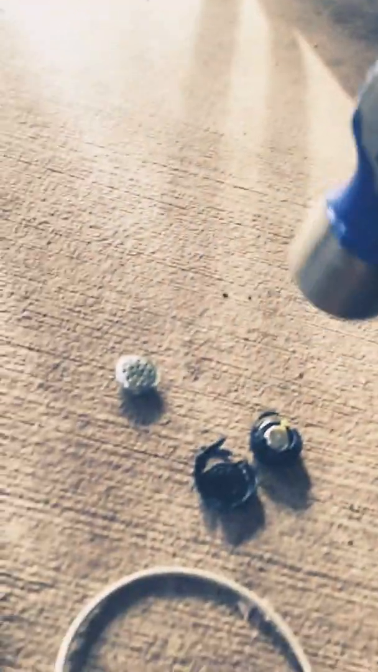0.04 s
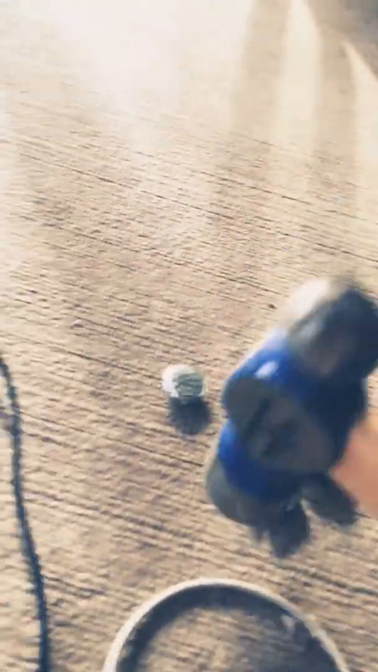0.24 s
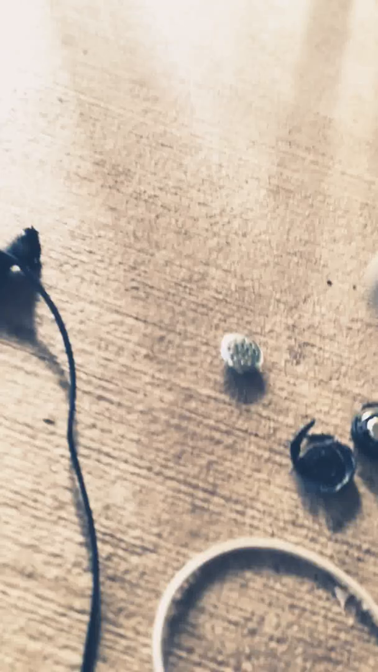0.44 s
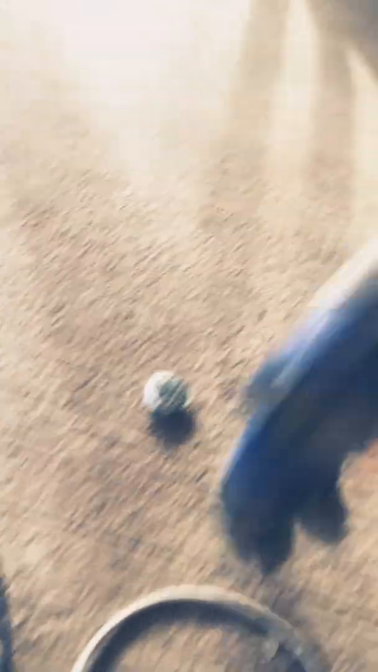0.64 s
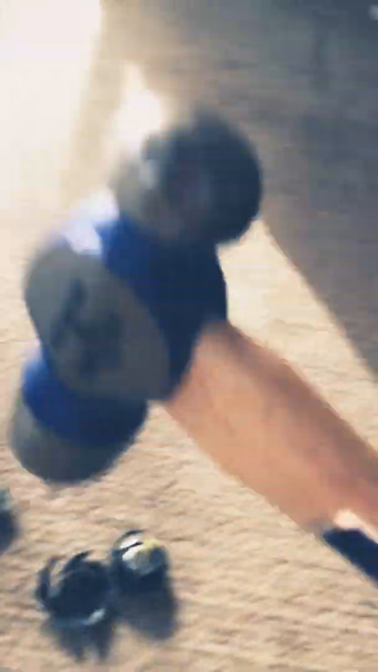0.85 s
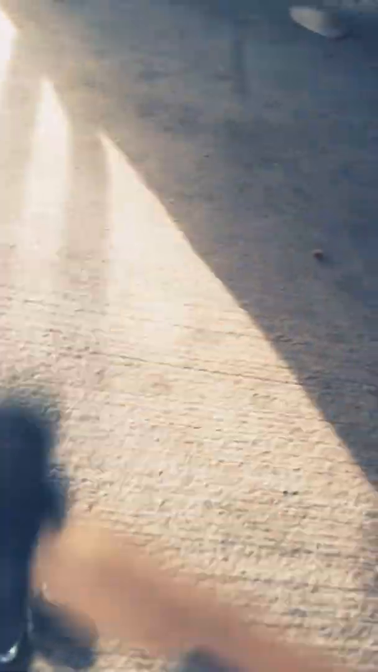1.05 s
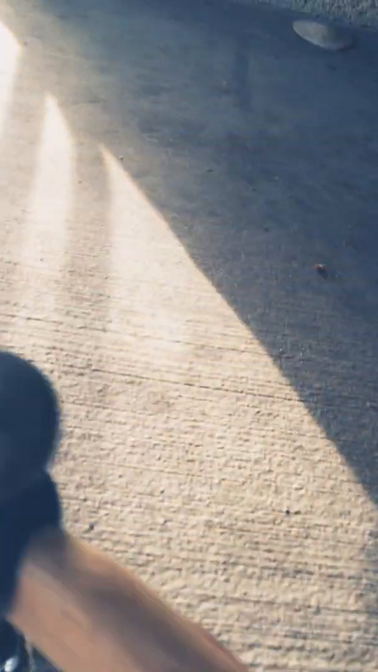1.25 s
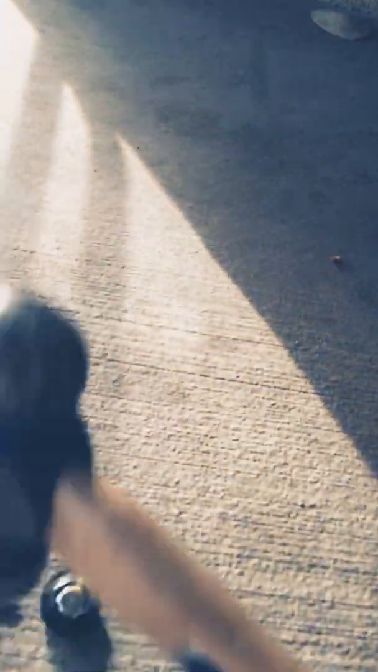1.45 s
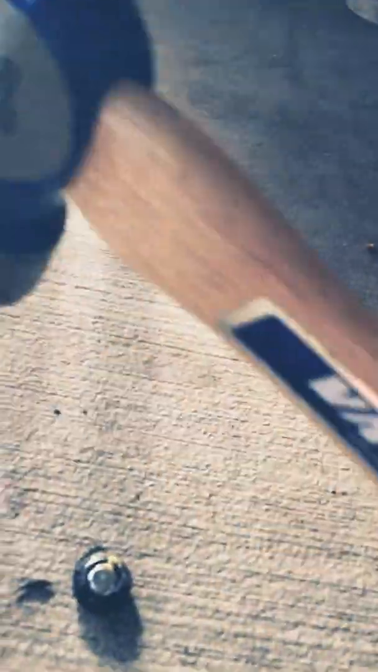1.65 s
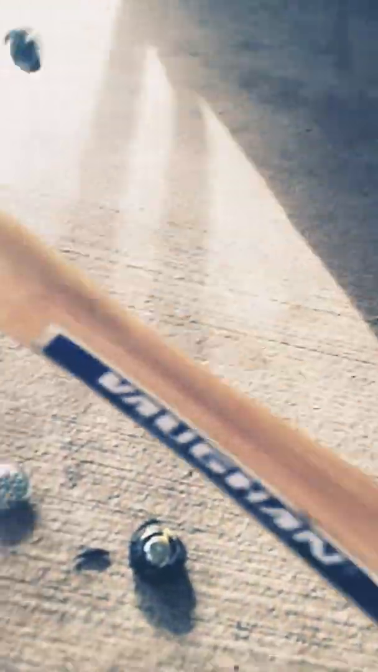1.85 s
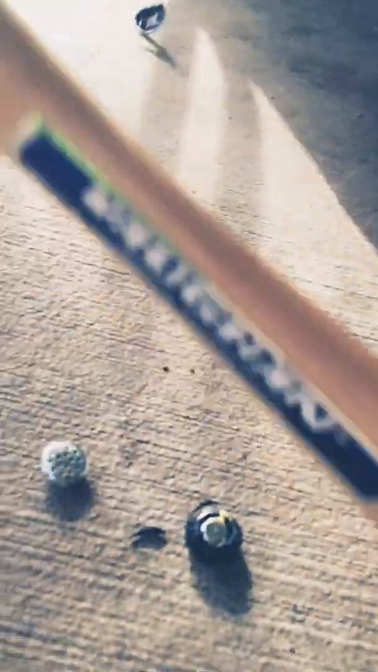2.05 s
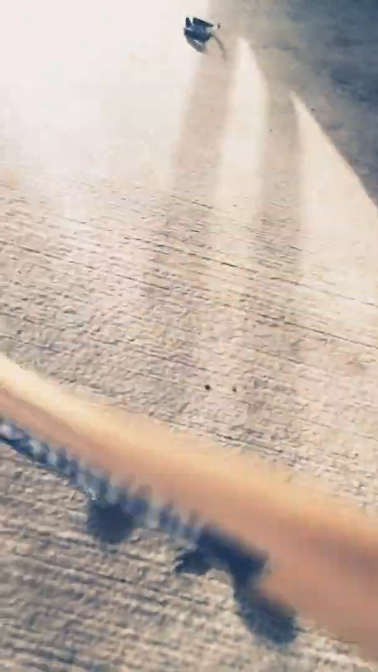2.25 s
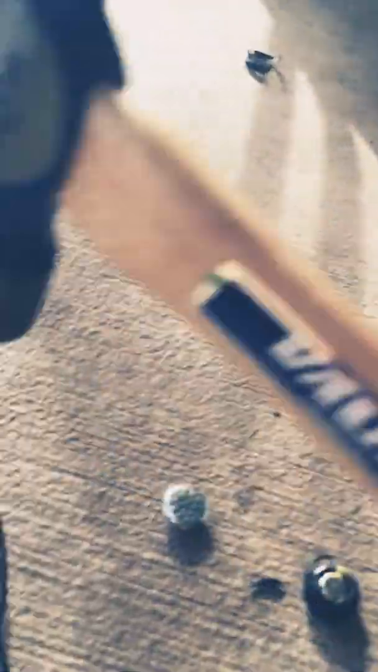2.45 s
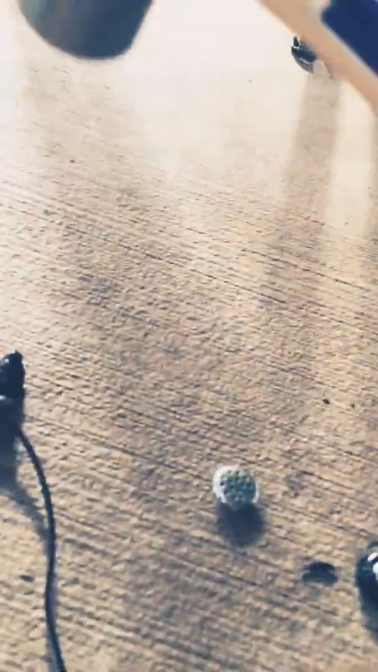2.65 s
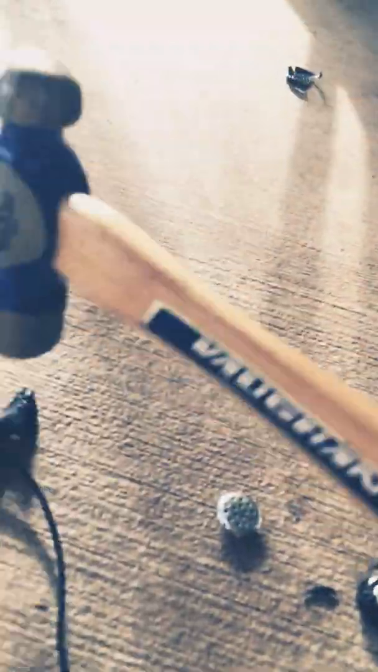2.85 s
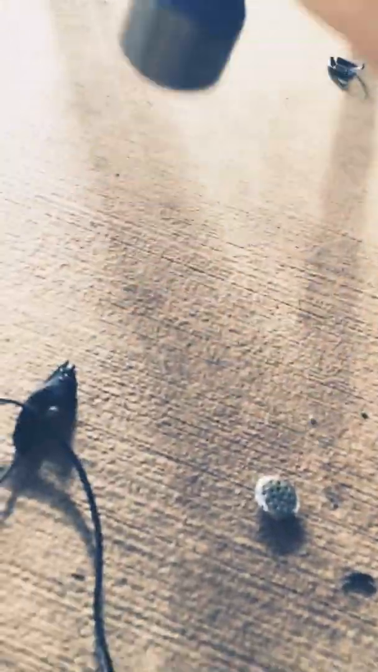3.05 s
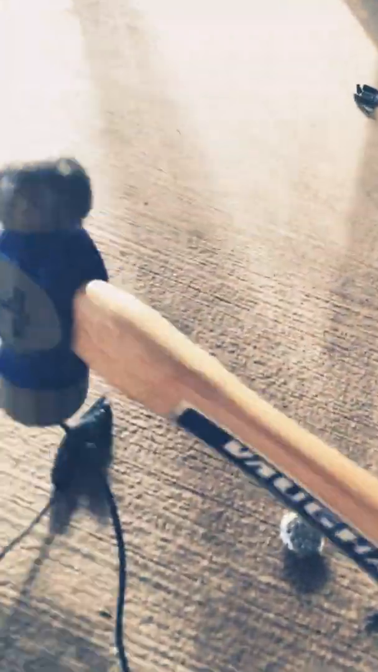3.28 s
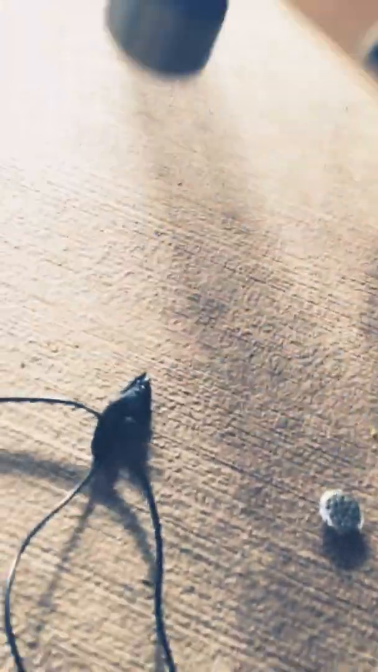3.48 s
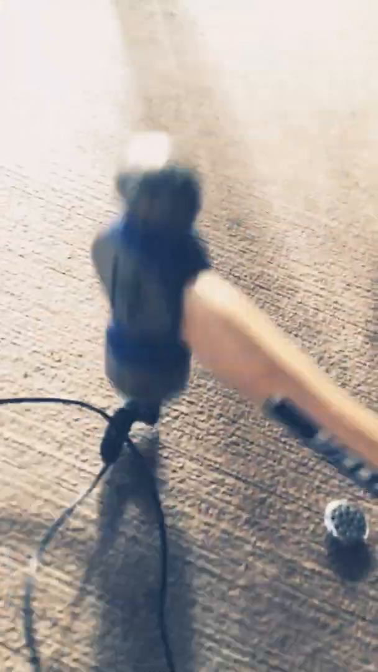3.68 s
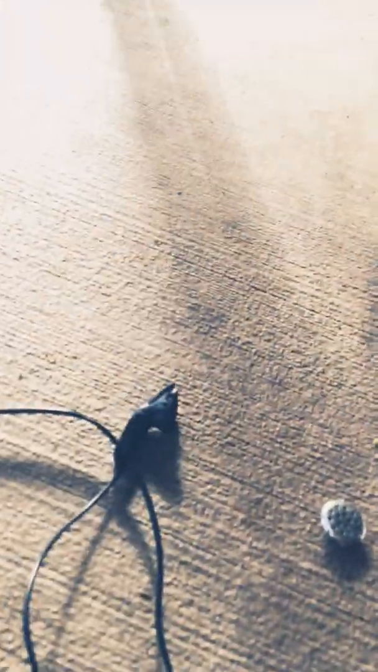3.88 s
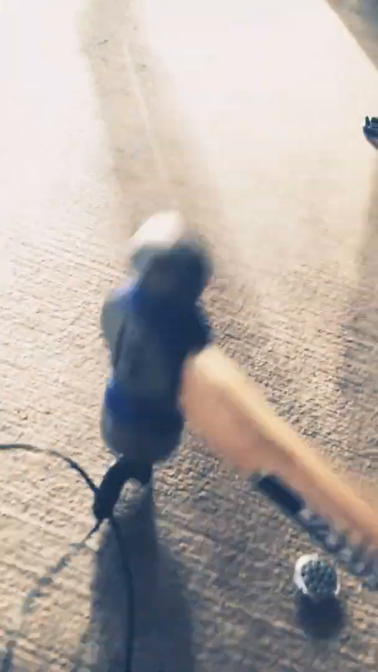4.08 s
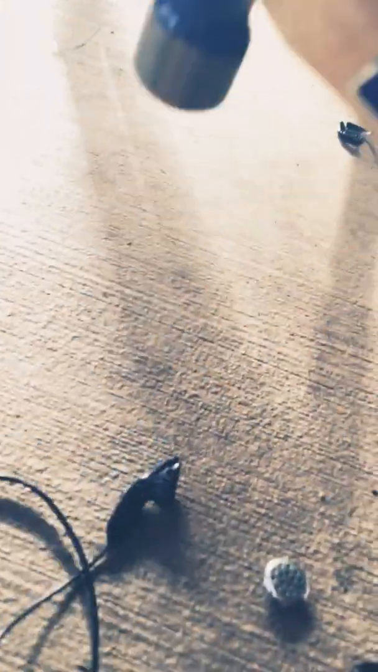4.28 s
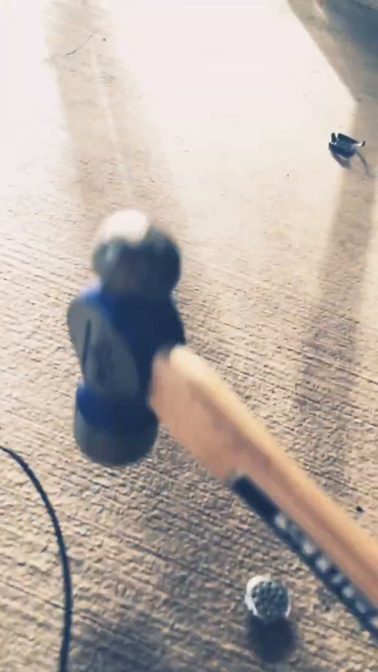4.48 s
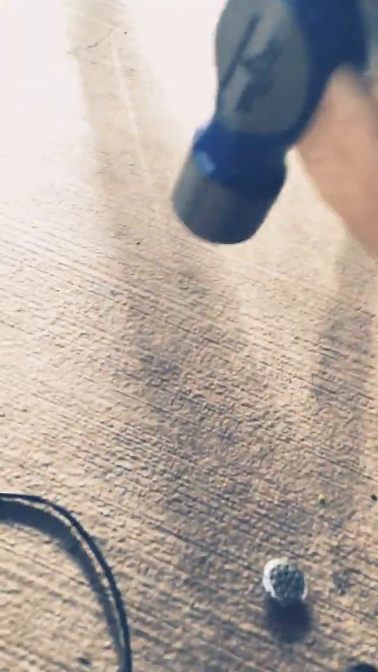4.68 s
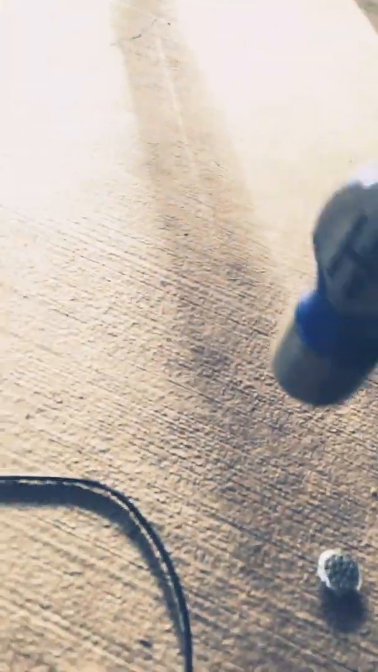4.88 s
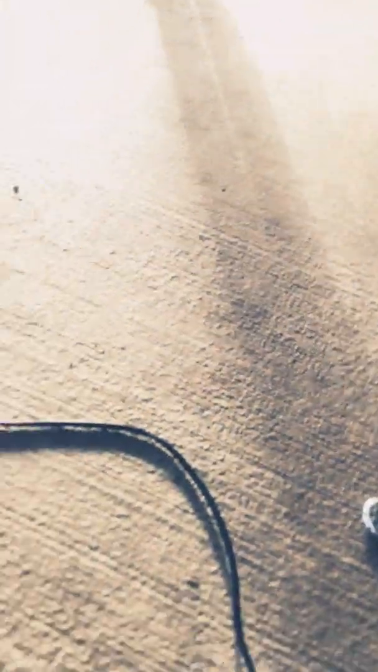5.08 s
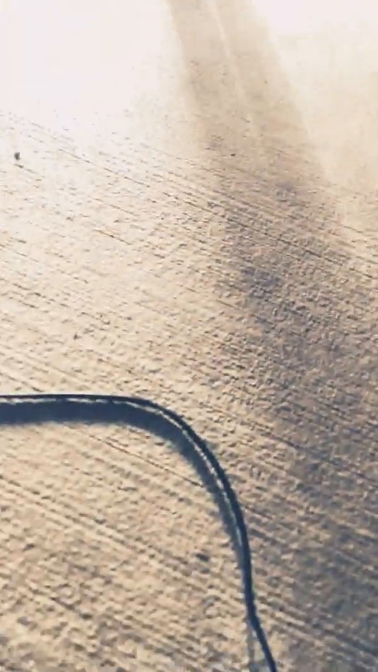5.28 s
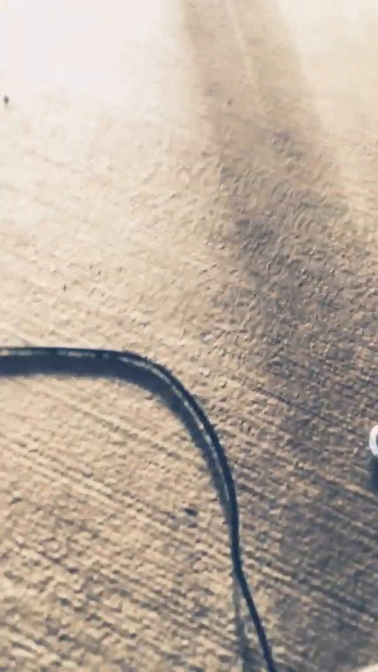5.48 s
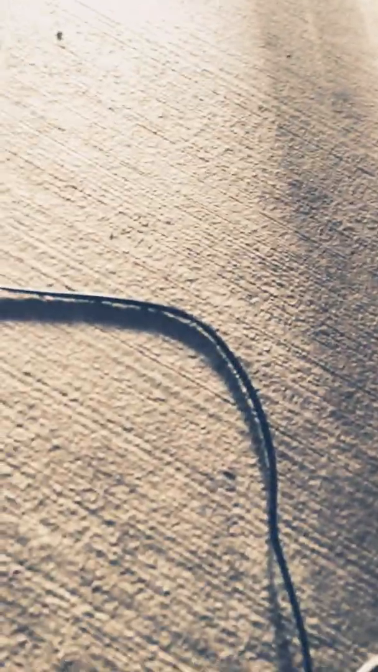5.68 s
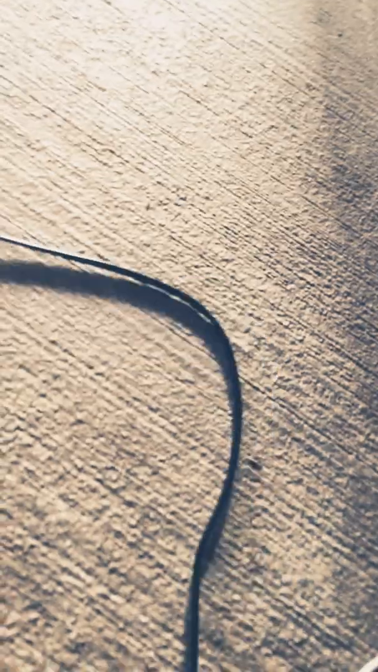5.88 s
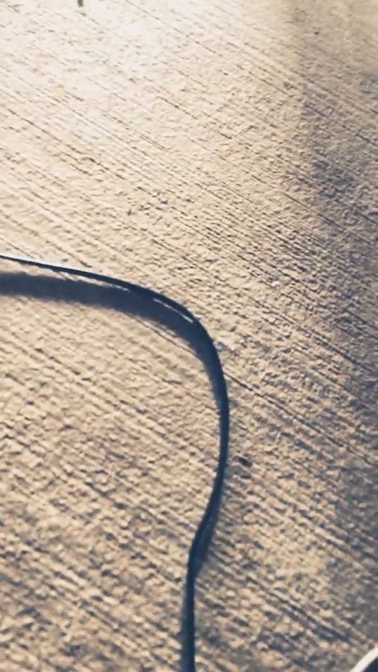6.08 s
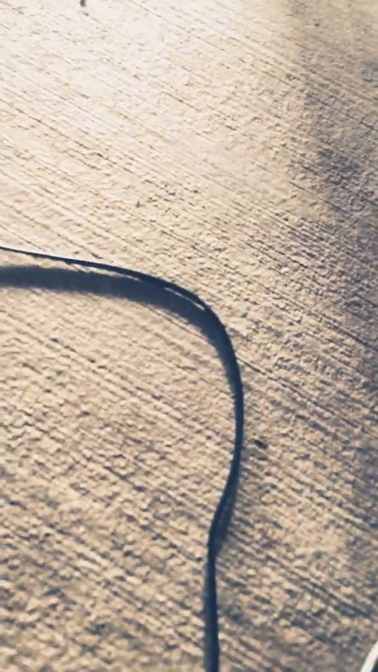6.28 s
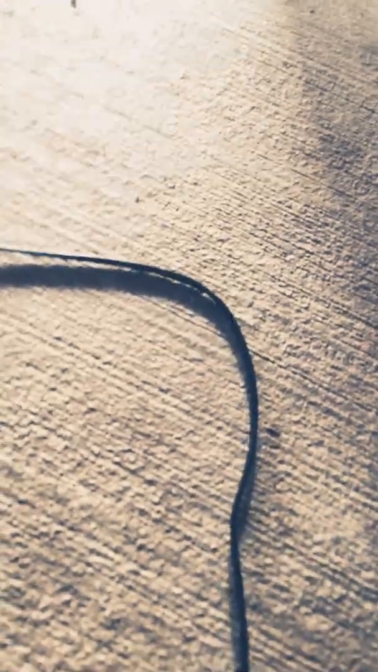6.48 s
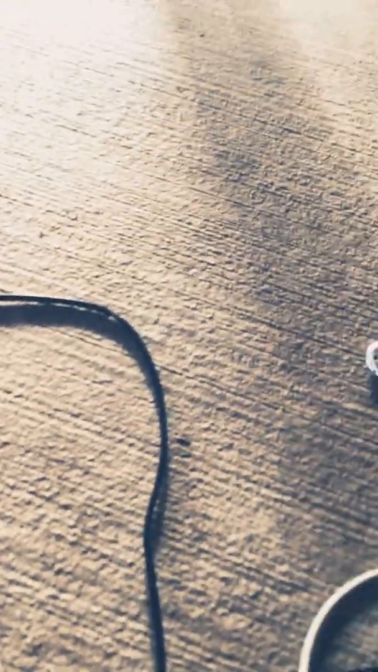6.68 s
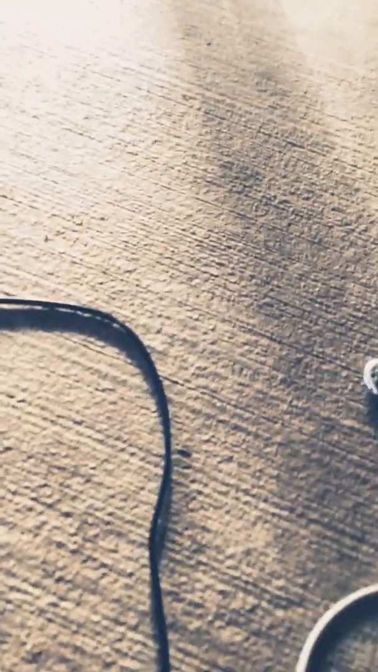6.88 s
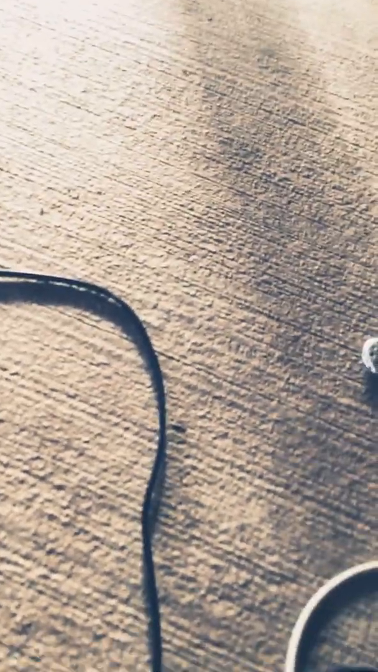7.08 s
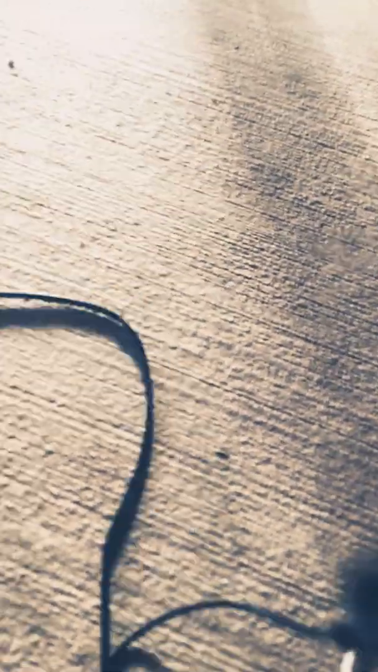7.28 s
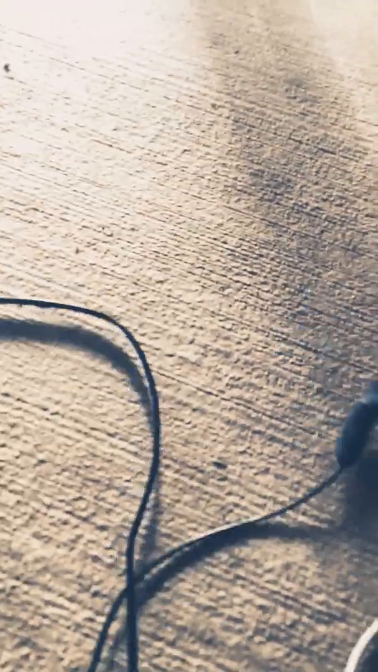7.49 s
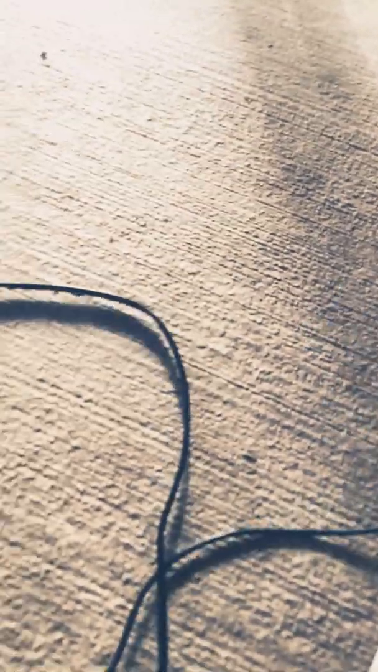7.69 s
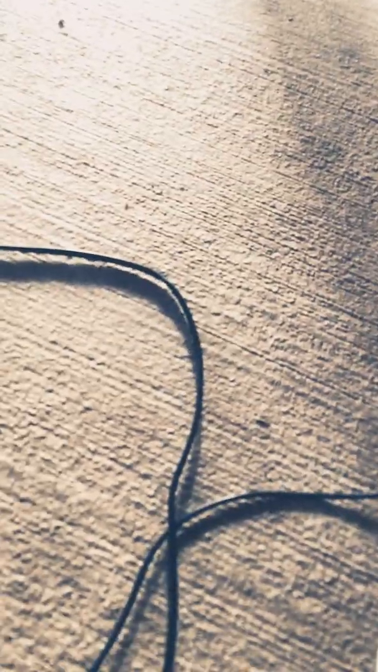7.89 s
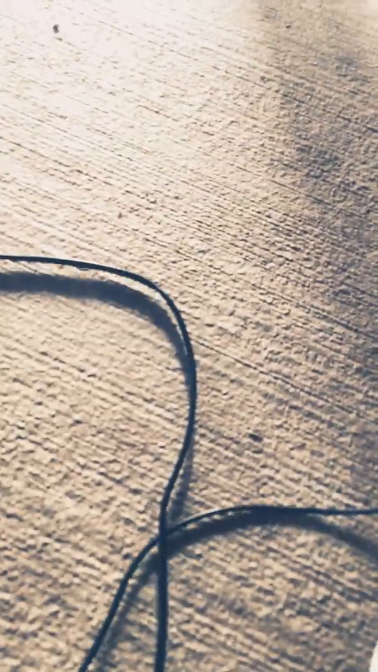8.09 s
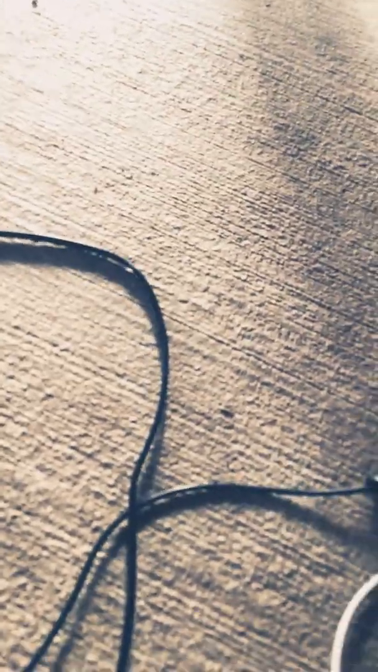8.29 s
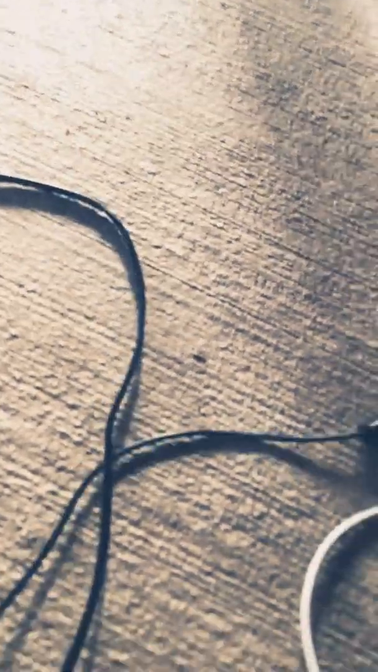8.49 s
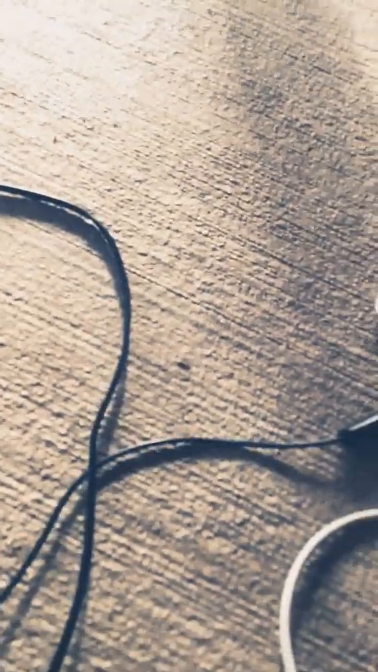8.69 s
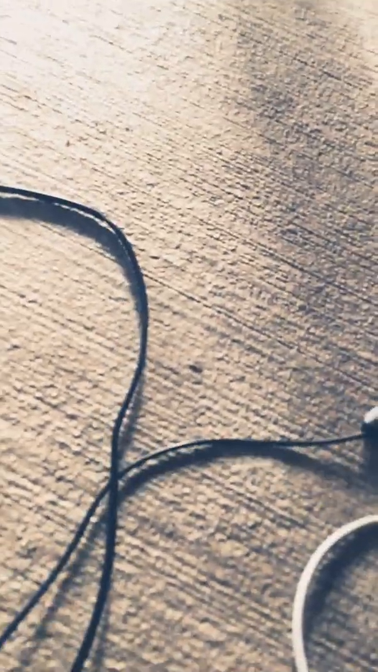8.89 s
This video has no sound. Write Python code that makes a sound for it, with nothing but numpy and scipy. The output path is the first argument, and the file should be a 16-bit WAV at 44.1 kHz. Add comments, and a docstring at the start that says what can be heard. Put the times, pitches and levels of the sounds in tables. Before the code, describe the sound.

Close, irregular hammer blows crunch brittle plastic against a concrete floor, scattering tiny clicking bits, while a soft low hum continues indoors.

```python
"""A low machine hum fills a room with a concrete floor; a phone microphone lies close to the blows.
A hammer crushes small plastic earpieces: at each blow filtered noise bursts snap as the plastic cracks,
then dying sines and crunch noise make the clack, and a thud sets off the slab ring; the room answers.
Fuzzy tones of resonant noise, mostly faint, sound during and between blows, fragments tick as they are
flicked or land, and later one loose shell hops and rings on dying sines."""
import sys
import numpy as np
from scipy import signal
from scipy.fft import rfft, irfft
from scipy.io import wavfile
from scipy.ndimage import uniform_filter1d

SR = 44100
rng = np.random.default_rng(int(sys.argv[2]) if len(sys.argv) > 2 else 0)


def file_out(sig):
    """Save sig as 16-bit WAV at sys.argv[1]."""
    # one column per channel
    cols = np.atleast_2d(sig).T
    # limit, then scale
    lim = np.clip(cols, -1, 1)
    pcm = np.round(lim * 32767).astype(np.int16)
    wavfile.write(sys.argv[1], SR, pcm)


N = 394254

EDGE_HZ = 16400  # upper band limit of the whole sound, and the highest ring of a crack
SNAP_LEAD_S = 0.0015  # a snap builds up this long before its onset
THUD_LEAD_S = 0.008  # the middle of the thud's push lies this far into its sound


def gain_of(db):
    """Decibels to amplitude."""
    return 10 ** (np.asarray(db) / 20)


def evened(x):
    """Scales to rms 1."""
    return x / np.sqrt(np.mean(x ** 2) + 1e-20)


def peaked(x):
    """Scales to peak 1."""
    return x / np.max(abs(x))


def read(points, hz):
    """Reads a table of values over frequency on a log-frequency axis."""
    f, value = np.transpose(points)
    return np.interp(np.log(hz + 1), np.log(f + 1), value)


def add(mix, s, near, far):
    """Places the direct sound in the first row and what the room receives in the second."""
    part = mix[:, round(s * SR):][:, :len(near)]
    part += np.array([near, far])[:, :part.shape[1]]


def resonate(x, hz, width):
    """One resonance of gain 1 at its centre: shift it to 0 Hz, smooth, shift back."""
    turn = np.exp(2j * np.pi * hz * np.arange(len(x)) / SR)
    r = np.exp(-np.pi * width / SR)
    return 2 * (turn * signal.lfilter([1 - r], [1, -r], x / turn)).real


def ring(modes):
    """Dying sines of a struck object, from modes of (Hz, dB, t60 in s)."""
    t = np.arange(SR // 2) / SR
    return sum(gain_of(db - 60 * t / t60) * np.sin(2 * np.pi * hz * t) for hz, db, t60 in modes)


def diffused(x, width_hz):
    """The room sums a burst over all directions: same energy and timing, spectrum smoothed."""
    z = rfft(x)
    power = uniform_filter1d(abs(z) ** 2, max(round(width_hz * len(x) / SR), 1))
    smooth = irfft(np.sqrt(abs(power)) * z / (abs(z) + 1e-12), len(x))
    fade = np.clip(np.linspace(3, -1, len(x)), 0, 1)  # full for the first half, silent in the last quarter
    return smooth * fade


def hum():
    """Low rumble of a machine: shaped noise with drifting patches, and one fuzzy motor line."""
    # Spectrum of the rumble. Each row: frequency in Hz, relative density in dB per Hz.
    spectrum = [(30, -62), (62, -38.5), (106, -19), (145, -10.5), (165, -7.5), (239, -2), (319, -17.5),
                (370, -15), (512, -22.5), (684, -28), (1460, -34), (1750, -49), (2100, -61), (16000, -65)]
    # Motor line. In order: frequency in Hz, width of each resonance in Hz, rms level in dB.
    line_hz, width, line_db = (593, 7, -75)
    rumble_db, patch_db = -55.5, 2.0  # rms level; rms depth of the patches
    frames, hz = N // 512 + 5, np.fft.rfftfreq(2048, 1 / SR)
    a, b, patches = rng.standard_normal((frames, 1025, 3)).T
    patches = uniform_filter1d(patches, size=5, axis=0)  # over frequency
    patches = evened(uniform_filter1d(patches, size=8, axis=1))  # over time
    z = (a + 1j * b) * gain_of(read(spectrum, hz)[:, None] + patch_db * patches)
    rumble = evened(signal.istft(z, nperseg=2048, noverlap=1536)[1][:N])
    line = resonate(rng.standard_normal(N), line_hz, width)
    line = evened(resonate(line, line_hz, width))
    return gain_of(rumble_db) * rumble + gain_of(line_db) * line


def snap(noise, hz, tilt_db, t60, ring_db, q):
    """A burst of fracture noise coloured by the plastic and by the ring of one shell piece."""
    # Colour of breaking plastic. Each row: frequency in Hz, relative level in dB.
    plastic = [(500, -25.5), (1500, -5), (3000, -0.5), (6000, 2.5), (10000, -3), (15000, -1.5),
               (17000, -17)]
    t = np.arange(len(noise)) / SR - SNAP_LEAD_S
    f = np.fft.rfftfreq(len(noise), 1 / SR)
    colour_db = read(plastic, f) + tilt_db * np.log2((f + 300) / 6000)
    coloured = evened(irfft(rfft(noise) * gain_of(colour_db)))
    burst = coloured * np.where(t < 0, np.exp(t / 0.00044), gain_of(-60 * t / t60))
    return peaked(burst + gain_of(ring_db) * resonate(burst, hz, hz / q))


def add_snap(mix, s, db, shape, room_db):
    """One snap, close by and as the room receives it."""
    sound = gain_of(db) * snap(rng.standard_normal(4096), *shape)
    add(mix, s - SNAP_LEAD_S, sound, gain_of(room_db) * diffused(sound, width_hz=670))


def cracks(mix):
    """The shell breaks under the descending head in runs of evenly spaced cracks."""
    # Runs of cracks. Each row: start in seconds, length in seconds, nominal peak of the first and of the
    # last crack in dB, nominal shell ring in Hz, tilt in dB per octave, room send in dB.
    runs = [(0.2856, .0025, -5, -21, 10500, 8, -11.5), (0.7276, .0038, -4, -14, 9800, 4.5, -13.5),
            (1.1504, 0.0014, -2.5, -14.5, 10800, 6.5, -16), (1.4344, .0044, -24, -22, 5100, -4.5, -9),
            (2.33, 0.0016, -7.5, -5, 4367, 4, -13), (2.8563, .0037, -7.5, -2.5, 8830, 2, -11.5),
            (3.3054, 0.0017, -3.5, -20.5, 14300, 3, -12.5), (3.747, .003, -7, -6, 14000, 4.5, -9.5),
            (4.152, .002, -10.5, -6, 10160, 2, -13), (4.5288, 0.004, -1, -9, 13400, 2.5, -17),
            (5.4634, .0033, -9, -6.5, 8500, 3.5, -12), (5.806, .0035, -13, 0, 10570, 2.5, -13),
            (6.3817, .0079, -17.5, -5, 7250, 5.5, -10), (6.8151, .0104, -19.5, -7, 6630, 3, -13.5),
            (7.2517, 0.01, -6, -8, 10440, 6, -17), (7.523, 0.0024, -5, -13.5, 11200, 5.5, -17.5),
            (8.1376, 0.0025, -2, -6, 6460, 5, -15), (8.429, .0036, -11.5, -2.5, 6900, 5.5, -14.5),
            (8.7942, .0058, -10, 0, 7070, 7.5, -17)]
    gap_s, t60, ring_db, ring_q = 0.0033, 0.0091, 4, 11  # the gap sets how many cracks a run holds
    level_spread_db, ring_spread = 2, 0.065  # random spread; that of the ring is a fraction of its Hz
    for s, length, first_db, last_db, run_hz, tilt_db, room_db in runs:
        count = int(np.clip(round(length / gap_s), 1, 7)) + 1
        for u in np.linspace(0, 1, count):
            db = first_db + u * (last_db - first_db) + level_spread_db * rng.standard_normal()
            hz = min(run_hz * (1 + ring_spread * rng.standard_normal()), EDGE_HZ)
            add_snap(mix, s + u * length, db, (hz, tilt_db, t60, ring_db, ring_q), room_db)


def knock(noise, handle_db, neck_db, head_db, crunch_db, crunch_hz, crunch_t60):
    """A blow shared among the hammer's damped modes, roughened by grit; crushed pieces crunch under it."""
    # Hammer modes: handle, neck, head. Each row: frequency in Hz, t60 in seconds.
    hammer = [(1160, 0.019), (2920, 0.0081), (5170, 0.014)]
    t = np.arange(len(noise)) / SR
    levels_db = (handle_db, neck_db, head_db)
    clack = ring([(hz, db, t60) for (hz, t60), db in zip(hammer, levels_db)])[:len(t)]
    clack *= 1 + evened(uniform_filter1d(noise, size=60)) / 5  # grit
    band = signal.butter(2, [crunch_hz / 2, crunch_hz * 2], "band", fs=SR, output="sos")
    push = noise[::-1] + 6 * np.exp(-t / 0.0001)
    crunch = signal.sosfilt(band, push * gain_of(-60 * t / crunch_t60))
    both = [clack, gain_of(crunch_db) * peaked(crunch)]
    return signal.sosfilt(signal.butter(2, 250, "high", fs=SR, output="sos"), both)


def steel_ring():
    """The steel face of the hammer rings faintly on high dying sines."""
    # Modes of the steel face. Each row: frequency in Hz, relative level in dB, t60 in seconds.
    modes = [(10720, 0, 0.16), (11500, -8.5, 0.1), (14020, -12, 0.086)]
    return ring(modes)


def thud(thud_db, thud_hz, slab_db, jolt_db):
    """A short push that falls in pitch; the slab ring swells, and the blow shakes the microphone."""
    # Modes of the concrete slab. Each row: frequency in Hz, relative level in dB, t60 in seconds.
    slab_modes = [(169.85, 0, 0.28), (210.3, -1, 0.22), (301.4, -3, 0.29)]
    t = np.arange(SR // 2) / SR - THUD_LEAD_S
    u = thud_hz * t
    cycles = np.where(u < 3, 1.11 * u - 0.24 * u ** 2, 0)
    push = np.cos(2 * np.pi * cycles) * np.exp(-(u / np.where(u < 0, 0.9, 0.85)) ** 2)
    swell = signal.windows.tukey(SR, 0.07)[:len(t)] ** 2  # rises over 35 ms
    slab = ring(slab_modes) * swell
    onset = np.clip(500 * (t + THUD_LEAD_S), 0, 1)  # 2 ms
    jolt = np.sin(2 * np.pi * 70 * t) * np.exp(-((t - 0.004) / 0.0029) ** 2) * onset
    return gain_of(thud_db) * push + gain_of(slab_db) * slab + gain_of(jolt_db) * jolt


def blows(mix):
    """The head meets the floor: clack and crunch, a faint ring of steel, then the thud in the slab."""
    # Blows. Each row: start in seconds, handle mode in dB, neck mode in dB, crunch in dB, crunch centre
    # in Hz, crunch t60 in seconds, room send in dB, delay of the thud in seconds, thud in dB,
    # nominal thud pitch in Hz, slab ring in dB, deep jolt in dB.
    strikes = [(0.2885, -12, -15.5, -12.5, 834, 0.04, -12.5, 0.0025, -24.5, 279, -30, -61),
               (0.7306, -21.5, -33.5, -19.5, 738, .027, -10, 0.0034, -24, 290, -33, -54),
               (1.152, -6, -13.5, -2, 1460, 0.022, -14, 0.0037, -22.5, 281.4, -30, -46),
               (1.4366, -14.5, -5.5, -5, 2430, .019, -8, 0.0052, -33.5, 254, -39.5, -34),
               (2.3305, -26, -32, -26.5, 1516, 0.022, -13, 0.0084, -34.5, 196.1, -48, -62),
               (2.86, -28, -22, -14.5, 710, 0.02, -23, 0.00482, -6, 200.6, -44.5, -22.5),
               (3.309, -26, -29.5, -17.5, 626, 0.015, -10.5, 0.0036, -19, 267, -31, -37),
               (3.751, -33, -35, -21.5, 604, 0.026, -11.5, 0.0058, -17, 271.5, -29, -39.5),
               (4.156, -36, -33.5, -15, 643, .036, -6, 0.0032, -12, 210, -26.5, -35),
               (4.5322, -21.5, -7, -6, 1544, .038, -2, 0.00052, -12.5, 240.4, -30.5, -17),
               (5.4662, -41.5, -40.5, -26.5, 2500, 0.02, -12, 0.0038, -43, 303.7, -55.5, -61),
               (5.8117, -27.5, -25, -21.5, 2000, 0.023, -7, 0.011, -25.5, 263, -33, -54.5),
               (6.3902, -25.5, -21.5, -16.5, 2830, 0.018, -3, 0.0027, -22, 248, -33, -43.5),
               (6.823, -20.5, -20, -11, 690, .021, -8.5, 0.0048, -11, 201.2, -29.5, -36),
               (7.268, -16, -9.5, -2, 1730, 0.11, -6.5, 0.0038, -21, 266, -30, -42.5),
               (7.5232, -46, -43.5, -37, 2500, 0.018, -15, .004, -53.5, 282, -58, -68.5),
               (8.14, -27, -29, -25.5, 1496, .02, -8.5, 0.0035, -20.5, 282.7, -29.5, -48),
               (8.4322, -28.5, -24.5, -13, 3254, 0.02, -7, 0.0057, -26, 274, -33.5, -52),
               (8.798, -40, -40, -38, 1190, .02, -4.5, 0.0081, -34.5, 246, -40, -63)]
    head_under_neck_db, steel_under_neck_db = 7, 31
    thud_room_under_slab_db = 2.5  # the room hears the thud through the slab
    for row in strikes:
        s, handle_db, neck_db, *crunch_shape, room_db, delay, thud_db, thud_hz, slab_db, jolt_db = row
        noise = rng.standard_normal(4096)
        clack, crunch = knock(noise, handle_db, neck_db, neck_db - head_under_neck_db, *crunch_shape)
        # the clack is sent to the room slightly weaker than the crunch
        far = gain_of(-1.5) * diffused(clack, width_hz=100) + diffused(crunch, width_hz=500)
        add(mix, s, clack + crunch, gain_of(room_db) * far)
        steel = gain_of(neck_db - steel_under_neck_db) * steel_ring()
        add(mix, s, steel, gain_of(room_db) * steel)
        sound = thud(thud_db, thud_hz, slab_db, jolt_db)
        far = gain_of(slab_db - thud_room_under_slab_db) * peaked(sound)
        add(mix, s + delay - THUD_LEAD_S, sound, far)


def room(x):
    """Tails of sparse taps whose bands die at their own speed, swelling at wall echoes; three take turns."""
    # Decay of the room. Each row: frequency in Hz, t60 in seconds.
    decay = [(150, 0.68), (700, .3), (1800, 0.24), (4800, 0.19), (9000, 0.13), (14000, 0.15)]
    # Clusters of wall echoes that stand out of the tail. Each row: delay in seconds, added gain in dB.
    walls = [(.008, -4), (0.021, 4), (0.033, -4), (0.047, 2)]
    # A longer tail from the far end of the room. In order: level in dB, factor on t60.
    late_db, late_factor = (-19.5, 2.2)
    out, t = np.zeros(N), np.arange(N) / SR
    for k in range(3):
        taps = np.zeros(SR // 2)
        at = np.arange(80, len(taps) - 10, 10)
        taps[at + rng.integers(0, 10, len(at))] = rng.choice([-1., 1.], len(at))
        tap_t = t[:len(taps)]
        taps *= 1.4 + sum(gain_of(db) * np.exp(-((tap_t - delay) / 0.0031) ** 2) for delay, db in walls)
        hz, s, z = signal.stft(taps, SR, nperseg=256)
        fall_db = -60 * s / read(decay, hz)[:, None]
        fall = gain_of(fall_db) + gain_of(late_db + fall_db / late_factor)
        tail = signal.istft(z * fall, SR, nperseg=256)[1]
        share = np.sqrt(2 / 3) * np.cos(np.pi * (t / 1.3 + k / 3))  # the three powers sum to 1
        out += signal.fftconvolve(x * share, tail / np.linalg.norm(tail))[:N]
    return out


def fuzzy_tones():
    """Tones during and between blows, mostly faint; two fade from a blow: noise through one resonance twice."""
    # Fuzzy tones. Each row: start in seconds, length in seconds, centre in Hz, width of each resonance
    # in Hz, starting rms level ahead of the soft ends in dB, fade in dB (a negative one grows).
    tones = [(.5, 0.36, 2310, 300, -83.5, -3), (1.494, 0.36, 2890, 250, -63, 20.5),
             (1.962, 0.12, 5500, 1202, -72, -8.5), (2.123, 0.17, 5950, 500, -67.5, 7),
             (2.22, 0.085, 2930, 149, -80, -2), (3.572, 0.15, 2740, 301.4, -75.5, 16),
             (4.406, 0.23, 5090, 400, -80, -2.5), (4.745, 0.21, 1997, 890, -65, 10),
             (6.082, 0.19, 2190, 310, -78, 1.5), (6.387, 0.3, 3340, 327, -40.5, 47),
             (6.45, 0.33, 5450, 599, -68, 11.5), (6.498, 0.26, 11070, 6030, -76, 6),
             (8.429, 0.16, 3290, 300, -45, 33), (8.755, 0.09, 3460, 496, -76, -6.5)]
    out = np.zeros(N + SR)
    for s, length, hz, width, db, fade_db in tones:
        noise = rng.standard_normal(round(length * SR))
        tone = evened(resonate(resonate(noise, hz, width), hz, width))
        soft_ends = np.sin(np.linspace(0, 1, len(tone)) ** 0.35 * np.pi)
        tone *= gain_of(db - np.linspace(0, fade_db, len(tone))) * soft_ends
        out[round(s * SR):][:len(tone)] += tone
    return out[:N]


def landings(mix):
    """Fragments are flicked or land; smaller pieces ring higher and tick brighter."""
    # Ticks of fragments. Each row: start in seconds, peak level in dB, ring in Hz.
    ticks = [(1.8741, -23, 8070), (1.8762, -26.5, 12100), (2.0326, -45, 13700), (2.036, -50, 8200),
             (2.096, -39.5, 2860), (2.101, -33, 8270), (2.131, -50.5, 2400), (2.1585, -35, 13400),
             (2.173, -35, 11800), (2.2264, -50, 14000), (2.234, -43.5, 8200), (2.335, -13.5, 4596),
             (2.422, -35, 10200), (3.3194, -28, 14500), (3.3468, -31, 5700), (3.3632, -25, 11400),
             (3.4019, -29, 14500), (3.6104, -25.5, 14300), (3.8133, -22.5, 10900), (4.175, -28.5, 12000),
             (4.251, -14.5, 10340), (4.3125, -26.5, 14000), (4.553, -22.5, 2600), (4.6182, -24.5, 6300),
             (4.6225, -19.5, 12200), (4.7327, -45.5, 11000), (5.482, -11.5, 11770), (5.486, -20.5, 11800),
             (5.5257, -29.5, 12400), (5.5412, -34, 12100), (5.8242, -12.5, 10100), (5.872, -33.5, 7400),
             (5.884, -37, 12500), (5.8904, -25, 12200), (5.898, -30.5, 12350), (5.9241, -23.5, 12100),
             (5.942, -36.5, 7100), (5.9543, -41.5, 7400), (5.9781, -48, 11900), (6.3897, -10, 3330),
             (6.4582, -34, 12400), (6.883, -30.5, 12100), (6.8981, -35.5, 3200), (7.268, -12.5, 2900),
             (7.2712, -18.5, 3100), (7.2876, -17.5, 3600), (7.3013, -13, 10700), (7.338, -25, 12300),
             (7.367, -41, 12000), (7.374, -36, 7000), (7.5322, -26, 10300), (7.5445, -27, 10800),
             (7.5479, -26.5, 10200), (7.5967, -39, 10600), (7.6058, -30, 10400), (7.6114, -33, 10300),
             (7.6175, -32.5, 10400), (7.647, -50.5, 11400), (7.6583, -42.5, 10100), (7.7028, -49, 10900),
             (7.7093, -55, 10900), (7.7335, -42.5, 11100), (7.7365, -35, 10700), (8.155, -20, 12400),
             (8.2262, -22.5, 12600), (8.232, -24.5, 12600), (8.4335, -8.5, 3460), (8.515, -28.5, 5600),
             (8.812, -21.5, 7000), (8.8676, -32.5, 4700)]
    t60, ring_db, ring_q, room_db = 0.009, 16, 18.5, -12
    for s, db, hz in ticks:
        tilt_db = 1 + 3.5 * np.log2(hz / 6000)  # dB per octave: 1 at a 6 kHz ring, 3.5 more per octave of ring
        add_snap(mix, s, db, (hz, tilt_db, t60, ring_db, ring_q), room_db)


def shell_hops(mix):
    """One loose shell hops on the floor and rings on its own modes each time."""
    # Hops. Each row: start in seconds, level in dB.
    hops = [(3.6091, -43), (3.8136, -32), (4.2503, -25.5), (4.312, -42), (4.705, -56.5)]
    # Modes of the shell. Each row: frequency in Hz, relative level in dB, t60 in seconds.
    shell = [(2117, -17, 0.039), (4216, -2, 0.041), (6380, -6, 0.03), (7350, -1.5, 0.016),
             (10410, 1, 0.033)]
    sound = ring(shell)
    for s, db in hops:
        add(mix, s, gain_of(db) * sound, gain_of(db - 15) * diffused(sound, width_hz=300))


def scene():
    """Cracks, blows, landings and hops, their room sound, and the background."""
    mix = np.zeros((2, N))  # close sound, room send
    cracks(mix)
    blows(mix)
    landings(mix)
    shell_hops(mix)
    near, sent = mix
    return (near + room(sent) + fuzzy_tones() + hum())[None]


def record(dry):
    """The microphone drops the deepest bass, the input rounds off the highest peaks; then the band limit."""
    thin = signal.sosfilt(signal.butter(2, 55, "high", fs=SR, output="sos"), dry)
    soft = 0.74 * np.tanh(thin / 0.74)
    band_limit = signal.firwin(255, EDGE_HZ, window=("kaiser", 9), fs=SR)
    return signal.oaconvolve(soft, band_limit[None], "same")


dry = scene()
out = record(dry)
file_out(out)
```